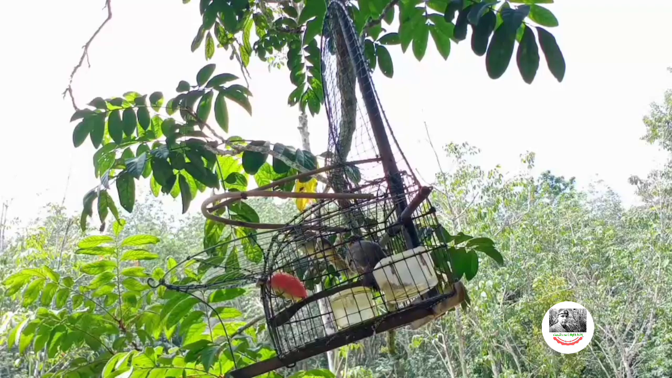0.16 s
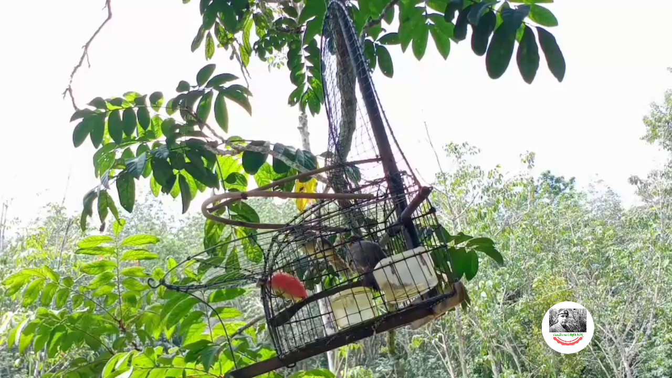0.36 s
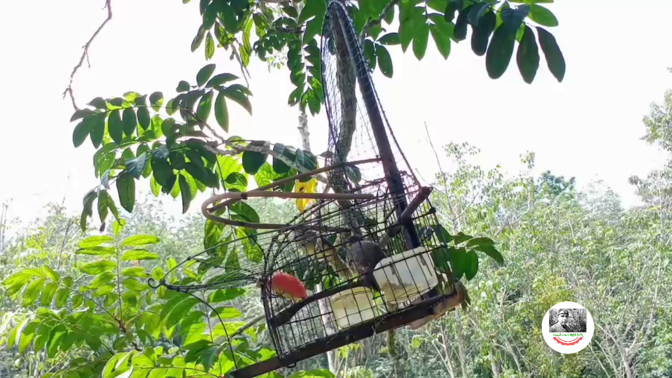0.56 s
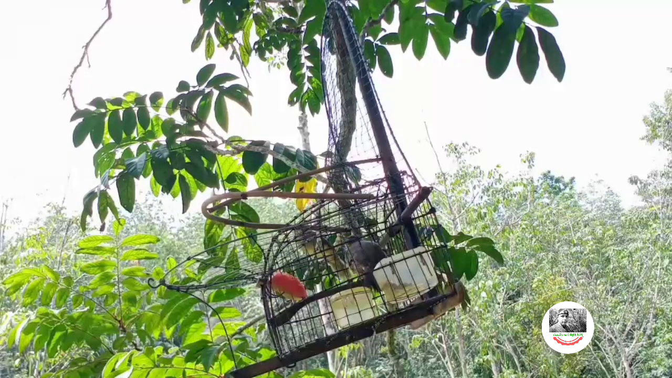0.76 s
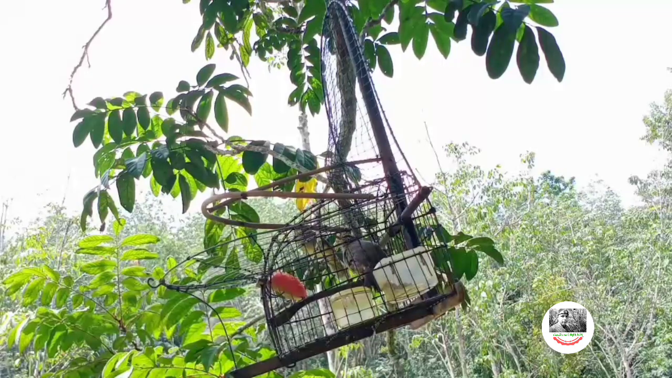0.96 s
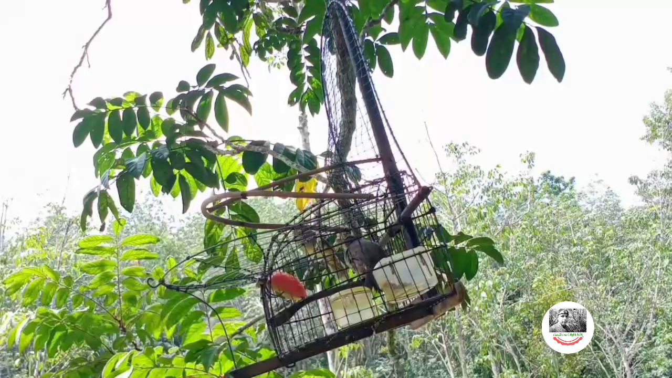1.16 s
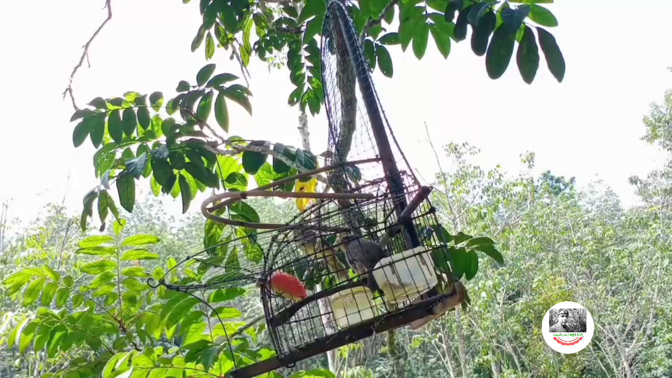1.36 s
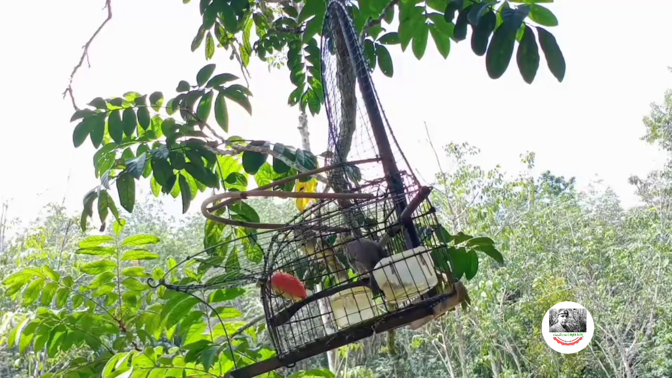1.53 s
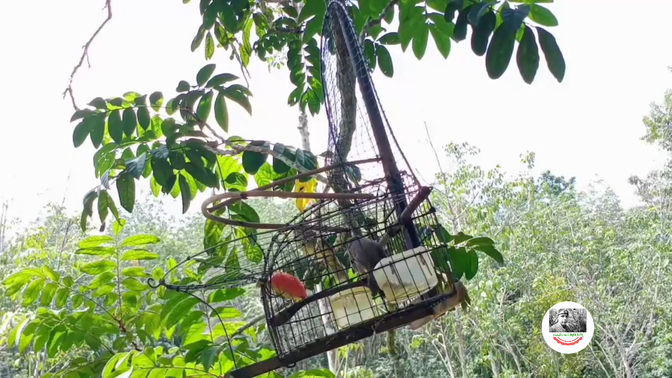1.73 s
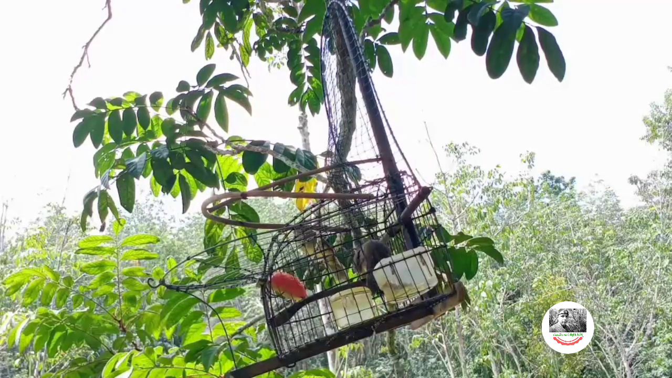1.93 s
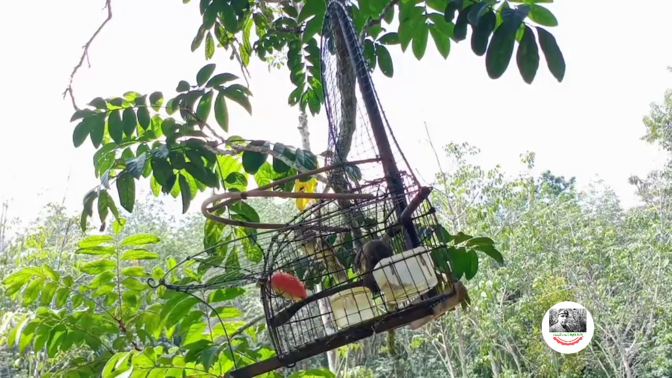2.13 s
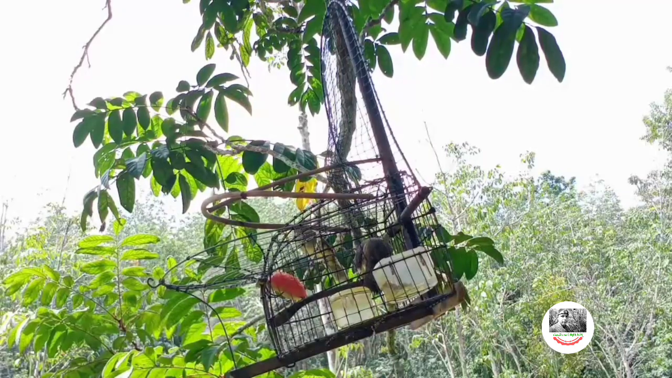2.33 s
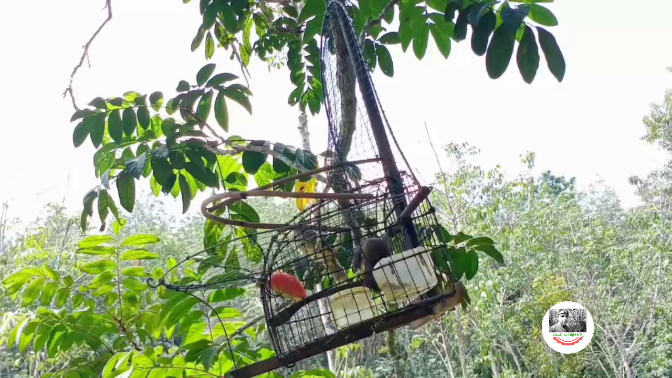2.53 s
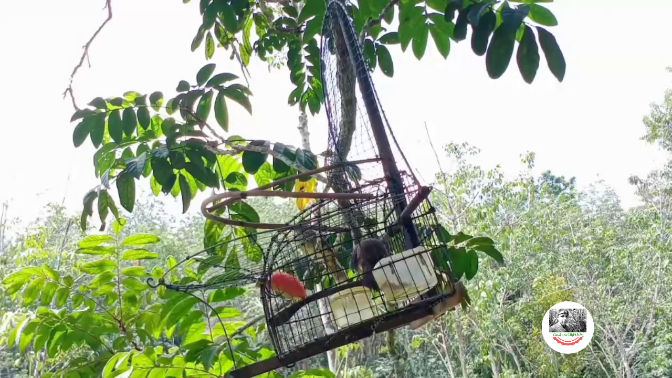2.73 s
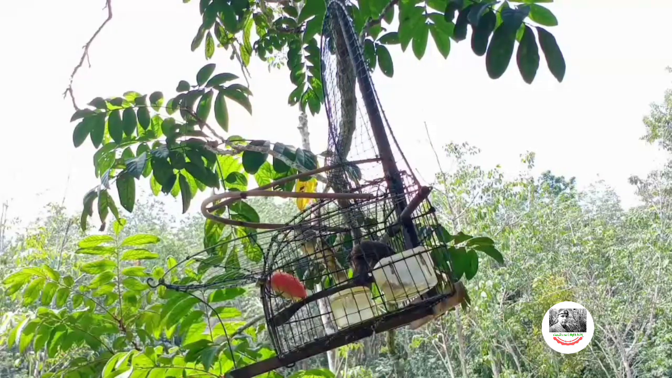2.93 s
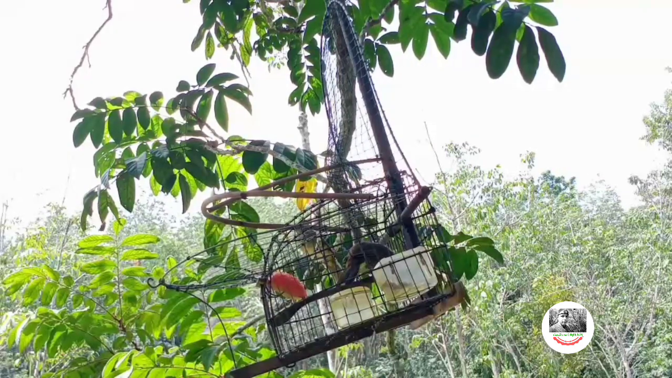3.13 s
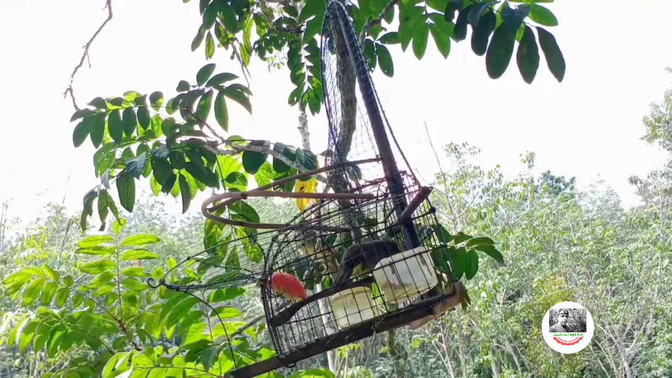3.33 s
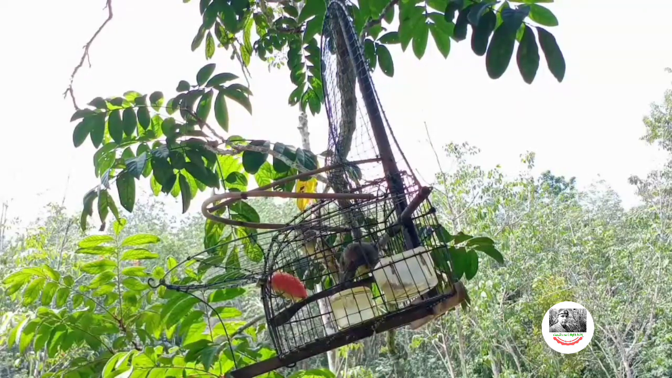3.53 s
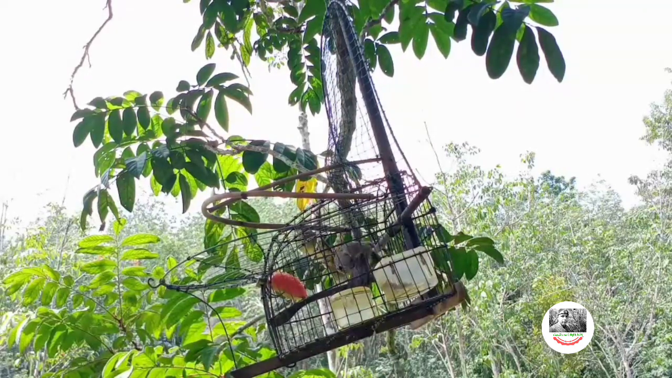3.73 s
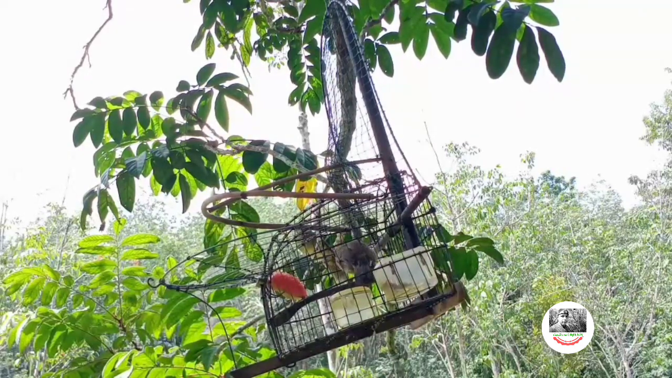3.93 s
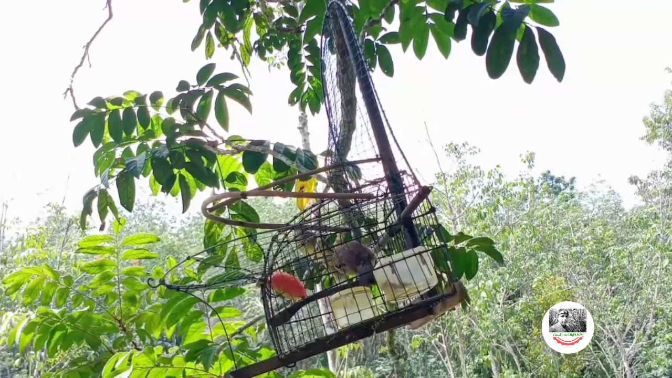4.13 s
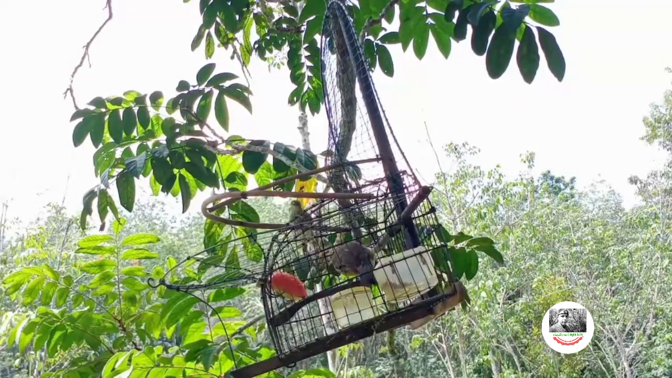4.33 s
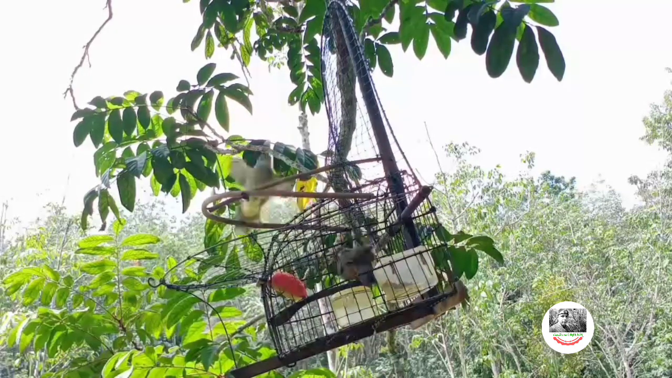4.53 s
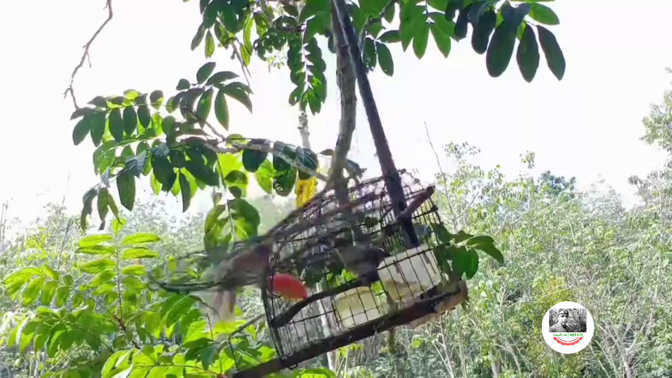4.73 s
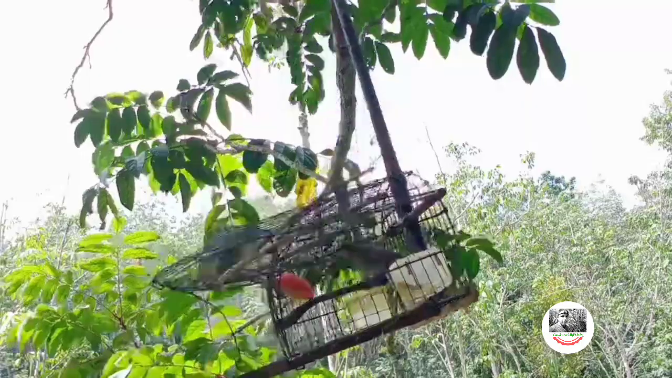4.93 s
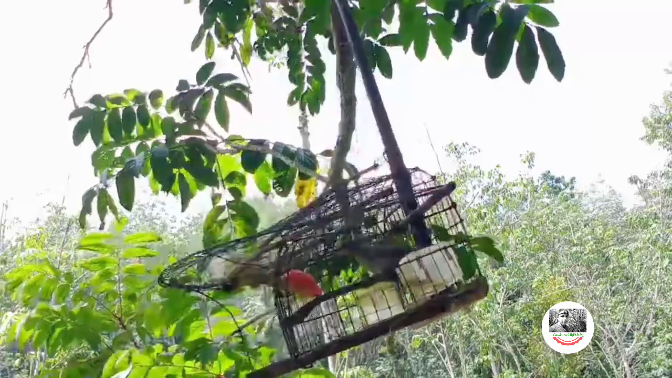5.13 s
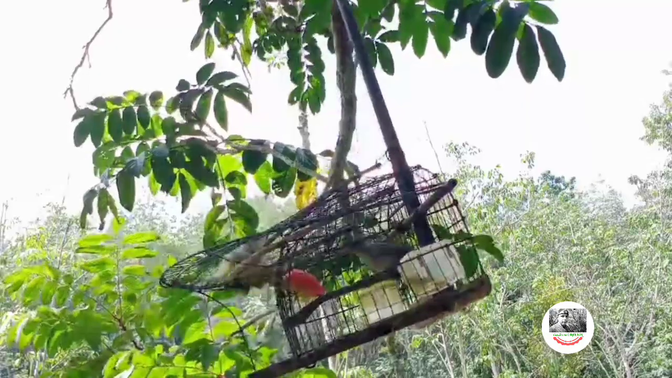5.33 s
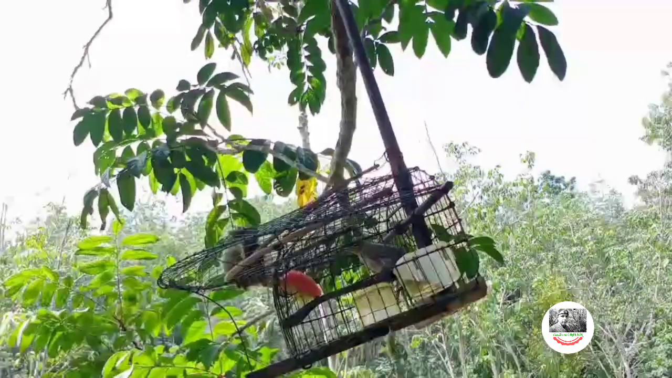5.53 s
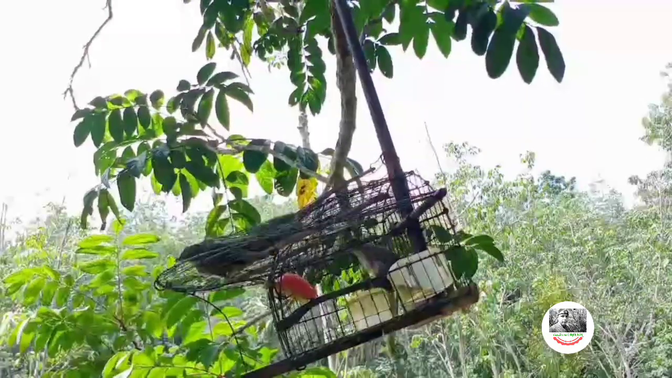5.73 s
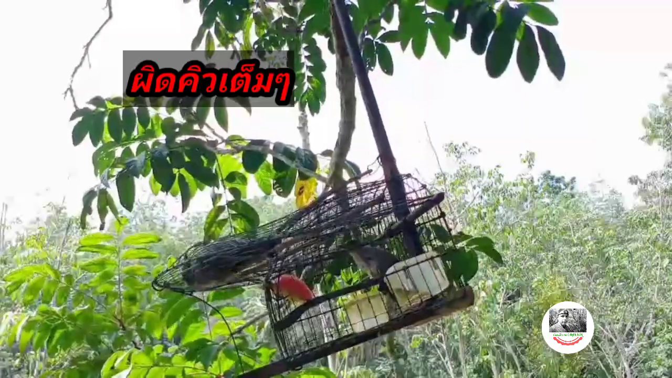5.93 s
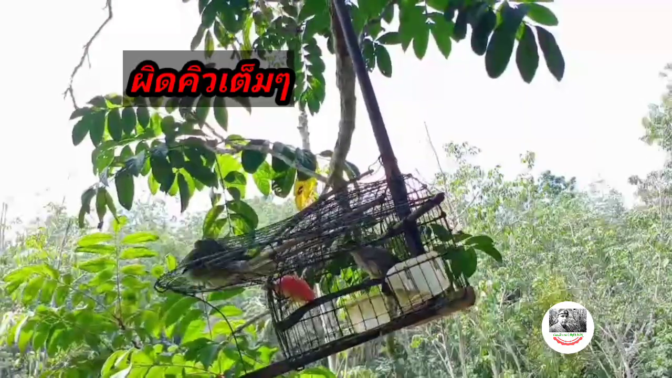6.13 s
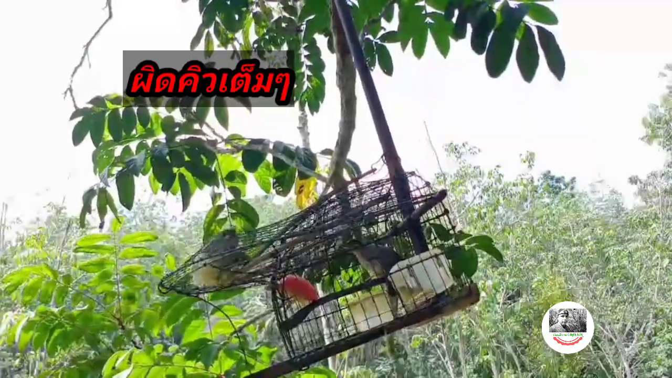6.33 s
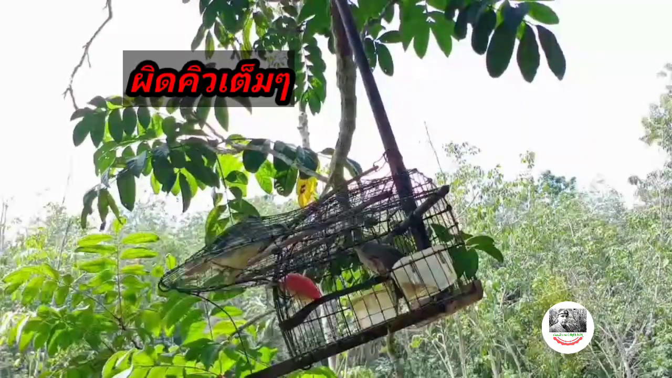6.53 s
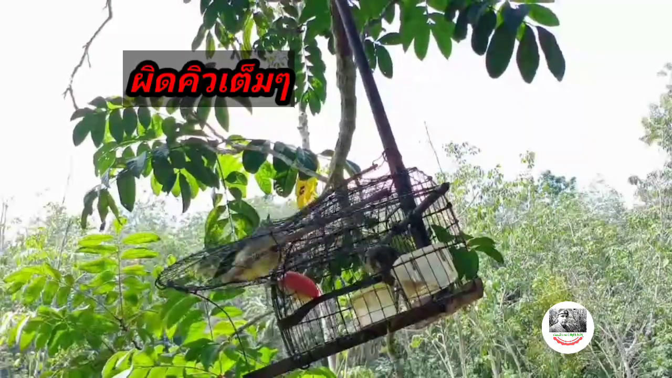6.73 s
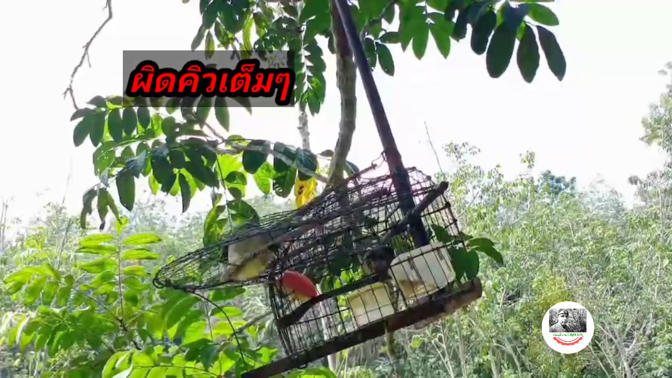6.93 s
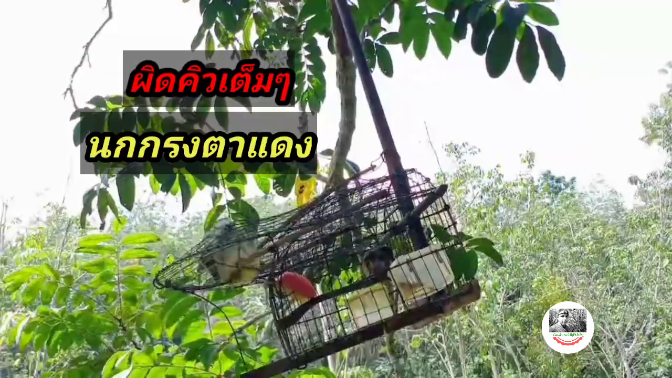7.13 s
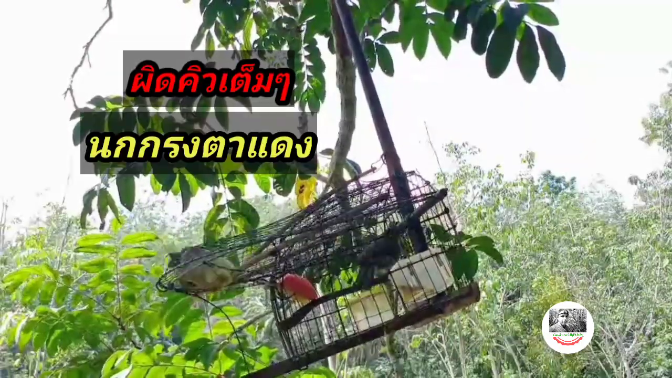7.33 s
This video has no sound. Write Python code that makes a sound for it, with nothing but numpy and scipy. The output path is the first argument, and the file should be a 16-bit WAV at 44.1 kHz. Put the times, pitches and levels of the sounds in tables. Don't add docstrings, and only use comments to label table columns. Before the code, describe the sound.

Calm open-air ambience: steady tiny chips, buzzy far trills blurred by leaves, an occasional clean rising whistle, soft low hum. Suddenly a sprung hoop slams on a wire cage, cracking and rattling loudly for under half a second with a dull puff of air. Afterwards feathers scrape wires, wings beat the net and claws tick bars, much softer, while sparse far calls continue. Close, dry cage; small phone microphone with crisp treble.

```python
import sys
import numpy as np
from scipy import signal
from scipy.io import wavfile
from scipy.ndimage import uniform_filter1d

SR = 44100
rng = np.random.default_rng(int(sys.argv[2]) if len(sys.argv) > 2 else 0)


def gain_from_db(level_db):
    decades = np.asarray(level_db, float) / 20
    return 10 ** decades


def master_out(mix):
    frames = np.transpose(np.atleast_2d(mix))
    ceiling = np.clip(frames, -1, 1)
    pcm = np.round(ceiling * 32767).astype(np.int16)
    wavfile.write(sys.argv[1], SR, pcm)


N = 325457


def cage():
    return gain_from_db(-1.2) * leaves(wings() + blows() + hoop(), .12, -20)


# peak in seconds, rise in ms, fall in ms, wires level in dB, frame level in dB.
SLAM_STROKES = [(4.482, 35, 21, -60.5, -71), (4.592, 64, 13, -58.5, -69), (4.665, 51, 37, -58, -58),
                (4.71, 23, 44, -60, -69), (4.754, 7.1, 33, -48, -40.5), (4.782, 3, 35, -36, -48),
                (4.808, 14, 3, -42, -71), (4.812, 2.2, 22, -37, -29), (4.831, 3, 29.3, -16.5, -15),
                (4.8224, 3, 7.3, -24, -23), (4.874, 14, 20, -26, -25), (4.893, 20, 9, -20.5, -32),
                (4.92, 22, 24, -35, -30.5), (4.938, 21, 3.6, -55, -29.5), (4.948, 92, 18, -40.5, -67),
                (4.996, 23, 15, -38.5, -43), (5.047, 33, 55, -39, -39), (5.079, 25, 18, -50, -38),
                (5.138, 50, 30, -42, -38), (5.186, 130, 18, -44, -56), (5.218, 12, 87, -54, -51.5)]
# peak in seconds, fall in ms, wires level in dB, frame level in dB.
WING_BEATS = [(5.353, 39, -50, -50), (5.435, 18, -49, -48), (5.48, 72, -49.5, -48), (5.569, 17, -48, -47),
              (5.62, 150, -50.5, -52), (5.79, 65, -47, -48.5), (5.843, 12, -42, -49),
              (5.937, 33, -48.5, -49), (6.02, 29, -55, -54), (6.098, 120, -57.5, -58.5),
              (6.16, 18, -51, -48), (6.291, 31, -51, -65), (6.364, 42, -48, -48.5), (6.44, 77, -56, -60),
              (6.518, 27, -48, -51), (6.568, 20, -45.5, -52), (6.612, 29, -45.5, -46),
              (6.67, 77, -50, -52.5), (6.778, 54, -42, -46), (6.912, 51, -43.5, -53),
              (6.995, 34, -49.5, -54.5), (7.06, 39, -46.5, -50), (7.149, 18.3, -35, -36.5),
              (7.269, 37, -51, -50.5), (7.345, 40, -55, -54)]
# peak in seconds, fall in ms, wires level in dB, frame level in dB.
WING_SLAPS = [
    (5.673, 7.8, -41.5, -41),
    (5.743, 19, -46.5, -43.5),
    (6.187, 72, -49, -49.5),
    (6.256, 14, -41, -38),
    (6.716, 47, -43.5, -39.5),
    (6.889, 20, -40.5, -38.5),
]
# peak in seconds, fall in ms, level in dB.
AIR_PUFFS = [(4.834, 15, -22), (4.89, 21, -33), (4.995, 15, -46), (5.065, 43, -44.5), (5.138, 20, -35),
             (5.36, 39, -49), (5.45, 55, -51), (5.585, 79, -51.5), (5.743, 27, -45), (5.85, 12, -45),
             (5.94, 27, -50), (6.19, 45, -55), (6.257, 9.4, -36), (6.367, 26, -45), (6.765, 67, -46.5),
             (6.888, 14, -35), (7.04, 55, -50), (7.145, 22, -42), (7.27, 35, -58)]
# pitch in Hz, width in Hz, level in dB.
FRAME_RINGS = [(1067, 330, -7.5), (1330, 190, -3.5), (1643, 470, -1.5), (2150, 660, -6.5), (2480, 650, -3),
               (3144, 490, -2.5), (3630, 1140, -1.5), (740, 300, -17)]
# frequency in Hz, level in dB per Hz.
PUSH_SPECTRUM = [(35, -24), (60, 2), (340, 6), (421, 1.5), (900, 2.5), (1170, -6.5), (1980, -120)]
# frequency in Hz, level in dB per Hz.
WIRE_SPECTRUM = [(2650, -19), (4500, -16), (5130, -18.5), (5910, -10), (6370, -13), (8410, 2), (9390, -5),
                 (11000, -13.5), (14800, -17), (15800, -8)]


def wings():
    rows = [(s, 0.81 * rise, *rest) for s, rise, *rest in SLAM_STROKES]
    rows += [(s, 0.82 * fall, fall, *levels) for s, fall, *levels in WING_BEATS]
    rows += [(s, 5.5, *rest) for s, *rest in WING_SLAPS]
    wire_envelope = strokes([(s, rise, fall, wires_db) for s, rise, fall, wires_db, _ in rows])
    frame_envelope = strokes([(s, rise, fall, frame_db) for s, rise, fall, _, frame_db in rows])
    push_envelope = strokes([(s, 0.77 * fall, fall, db) for s, fall, db in AIR_PUFFS])

    flutter = gain_from_db(1.7 * slow(0.0028))
    wires = wire_envelope * flutter * grains(8000, 1.3, .7)
    canes = np.zeros(N)
    for hz, width, db in FRAME_RINGS:
        brushing = gain_from_db(db + 1.5 * slow(.008))
        canes += brushing * resonate(grains(1400, 2, .6), hz, width)
    frame = frame_envelope * flutter * evened(canes)
    gusts = np.minimum(push_envelope, .8 * frame_envelope) * rng.standard_normal(N)
    return coloured(wires, WIRE_SPECTRUM) + gain_from_db(-2.13) * frame + gain_from_db(-2.0) * coloured(gusts, PUSH_SPECTRUM)


# start in seconds, wires level in dB, bar level in dB, ring of the bar in Hz.
LID_BLOWS = [(4.738, -46, -48, 1460), (4.7466, -37, -31, 3300), (4.7514, -25.5, -54, 900),
             (4.7662, -37, -38, 3830), (4.7767, -30, -49, 1290), (4.7861, -19, -40, 4400),
             (4.801, -29, -55, 3550), (4.82, -25, -30, 990), (4.8293, -5.5, -18, 3080),
             (4.8322, -7, -17, 1500), (4.8385, -16, -27, 1600), (4.8423, -10, -22, 3100),
             (4.8498, -16, -27, 1310), (4.8535, -17, -20, 1100), (4.8755, -18, -22, 4500),
             (4.8085, -29, -31, 3800), (4.797, -27, -43, 1500), (4.8802, -15, -23, 1120),
             (4.8912, -15, -19.5, 1430), (4.8965, -19, -21, 1260), (4.9095, -20, -38, 1510),
             (4.9905, -27.5, -32, 3300), (4.9945, -33, -39, 1100), (4.7598, -45, -41, 1300),
             (4.771, -46, -36, 1320), (4.9555, -45, -41, 1350), (4.964, -45, -40, 1350),
             (4.978, -41, -36, 1350)]
# start in seconds, wires level in dB, bar level in dB, ring of the bar in Hz.
CLAW_BLOWS = [(5.0575, -31, -38, 2470), (5.106, -26, -35, 4020), (5.114, -37, -38, 800),
              (5.1593, -32, -36, 2830), (5.128, -36, -43, 1500), (5.175, -58, -40, 1400),
              (5.186, -55, -44, 1400), (5.074, -50, -38, 1500), (5.1435, -36, -36, 1760),
              (5.2558, -38.5, -40, 3360), (5.3558, -41, -46, 3770), (5.4267, -45, -47, 4050),
              (5.567, -36, -40, 980), (5.6336, -48, -37, 3400), (5.6697, -44, -26.5, 3440),
              (5.698, -45, -42.5, 1560), (5.7448, -42, -38.5, 1520), (5.936, -49, -41.5, 1170),
              (6.157, -39, -45, 2730), (6.19, -40, -36, 3360), (6.2543, -27.5, -26, 3760),
              (6.2608, -36, -38, 824), (6.312, -55, -41.5, 1380), (6.3506, -41, -44, 1620),
              (6.361, -52, -46, 1700), (6.378, -52, -50, 1800), (5.4913, -50, -43, 1800),
              (6.4155, -58, -40, 2150), (6.5653, -46, -41, 3190), (6.7301, -43, -38, 3100),
              (6.7457, -44, -39, 1300), (6.752, -44, -38, 1500), (6.769, -42, -37, 1500),
              (6.7115, -47, -38, 1310), (7.133, -44, -37, 1500), (7.1395, -34, -42, 2000),
              (6.7807, -31, -32.5, 3000), (6.8883, -39, -35, 3050), (6.8933, -44, -40, 800),
              (7.1453, -26.5, -44, 2940), (7.2632, -41, -43, 3500), (7.3178, -34.5, -42.5, 1370)]
# start in seconds, wires level in dB.
QUILL_TICKS = [(4.5736, -55), (5.073, -31), (5.1765, -42), (5.602, -40), (5.7243, -45), (5.7618, -42),
               (6.154, -45), (6.374, -42), (7.2052, -47), (5.1844, -35), (5.273, -40), (5.5496, -40),
               (5.6172, -47), (5.787, -37.5), (5.828, -40), (5.846, -46), (5.981, -44.5), (6.4566, -44),
               (6.608, -40), (6.691, -45), (7.045, -36.5), (7.3696, -46)]
# frequency in Hz, level in dB per Hz.
KNOCK_SPECTRUM = [(410, -36), (700, 5), (1330, -9), (2060, 6), (3480, -2), (4100, 2.5), (4710, 0.5),
                  (5500, -18), (7150, -57), (12100, -120)]


def blows():
    quills = [(s, db, db - 13.5, 1600) for s, db in QUILL_TICKS]
    wires, bars = np.zeros((2, N))
    t = np.arange(round(.04 * SR)) / SR
    crack_decay = gain_from_db(-60 * t / 0.013)
    for s, wires_db, bar_db, hz in LID_BLOWS + CLAW_BLOWS + quills:
        sharp, dull = rng.standard_normal((2, len(t)))
        sharp[0] = 5 * np.sign(sharp[0])
        dull[0] = 5 * np.sign(dull[0])
        add(wires, s, gain_from_db(wires_db + 0.5) * crack_decay * sharp)
        ring_decay = gain_from_db(-60 * t * hz / 34.7)
        knock = 0.57 * crack_decay * coloured(dull, KNOCK_SPECTRUM)
        ring = 0.89 * ring_decay * resonate(dull, hz, .27 * hz)
        add(bars, s, gain_from_db(bar_db + 2.5) * (knock + ring))
    return coloured(wires, WIRE_SPECTRUM) + bars


# peak in seconds, rise in ms, fall in ms, level in dB.
HOOP_SHUDDERS = [
    (4.765, 6.3, 13, -43),
    (4.835, 7.3, 36, -17),
    (4.925, 30, 15, -31),
    (4.965, 15, 18, -48),
    (5.08, 33, 24, -46),
    (5.15, 27, 30, -45.5),
]
# pitch in Hz, width in Hz, level in dB.
HOOP_RINGS = [(1085, 83, 1), (1337, 240, -1), (1550, 130, -0.5), (3090, 73, -10.5), (349, 39, -15)]


def hoop():
    rings = np.zeros(N)
    for hz, width, db in HOOP_RINGS:
        rings += gain_from_db(db) * resonate(grains(900, 2.6, 0.28), hz, width)
    return strokes(HOOP_SHUDDERS) * evened(rings)


# start in seconds, glide in seconds, top pitch in Hz, level in dB, octave level in the glide in dB.
NEAR_WHISTLES = [
    (0.766, 0.049, 2287, -51.5, -76),
    (3.797, 0.051, 2150, -49, -56),
]
# time in seconds, pitch in Hz, level in dB, octave level in dB.
SCOLDING = [
    [(1.011, 1640, -55, -85), (1.024, 2410, -56, -85), (1.031, 1770, -48, -66), (1.041, 1490, -55, -56),
     (1.055, 1600, -54, -72)],
    [(1.07, 1080, -53, -56), (1.08, 1060, -56, -52), (1.09, 1225, -56, -52.5), (1.102, 1230, -64, -59)],
]


def near_bird():
    out = np.zeros(N)
    hold = 0.043
    for s, glide, top_hz, db, glide_octave_db in NEAR_WHISTLES:
        top = s + glide
        held_octave_db = db - 26
        rows = [(s, .57 * top_hz, db - 21, glide_octave_db - 6),
                (s + 0.62 * glide, .76 * top_hz, db - 3.0, glide_octave_db),
                (top, .985 * top_hz, db, held_octave_db),
                (top + 0.27 * hold, top_hz, db, held_octave_db),
                (top + hold, 0.98 * top_hz, db - 4, held_octave_db)]
        add(out, *warble(rows, .006, 1.6))
    for rows in SCOLDING:
        add(out, *warble(rows, .006, 1.6))
    return leaves(out, .25, -16)


# start in seconds, length in seconds, from Hz, to Hz, level in dB.
FAR_SLURS = [
    (1.765, .035, 3600, 3720, -61),
    (2.048, .032, 3630, 3690, -62),
    (5.29, .035, 3450, 3720, -62),
    (6.4, .045, 8260, 7400, -54),
]
# time in seconds, pitch in Hz, level in dB.
FIRST_LONG_RISE = [(1.797, 3150, -62), (1.81, 3380, -56), (1.85, 3760, -52), (1.87, 4050, -49),
                   (1.9, 4340, -50), (1.935, 4440, -49), (1.96, 4980, -55), (1.985, 5230, -58),
                   (2.01, 5430, -59)]
# time in seconds, pitch in Hz, level in dB.
SECOND_LONG_RISE = [(5.335, 3450, -60), (5.39, 3920, -57), (5.423, 4440, -55), (5.469, 4810, -52),
                    (5.495, 5300, -52), (5.513, 5740, -49), (5.53, 5790, -54), (5.55, 5800, -58)]


def far_birds():
    out = np.zeros(N)
    for s, length, from_hz, to_hz, db in FAR_SLURS:
        rows = []
        for share, swell_db in [(0, -3.5), (0.42, 0), (1, 5.5)]:
            hz = from_hz + share * (to_hz - from_hz)
            rows.append((s + share * length, hz, db + swell_db, db + swell_db - 17))
        add(out, *warble(rows, .014, 2.5))
    for rise in (FIRST_LONG_RISE, SECOND_LONG_RISE):
        rows = [(s, hz, db - 1.5, db - 18) for s, hz, db in rise]
        add(out, *warble(rows, .012, 2.2))
    add(out, 0.028, gain_from_db(-7) * out.copy())
    return gain_from_db(-.5) * leaves(out, .4, -6)


# time in seconds, peak level in dB.
SMALL_CHIPS = [(0.0313, -49.5), (0.2219, -50.5), (0.4284, -50), (0.619, -51.5), (0.8135, -49.5),
               (0.9991, -49.5), (1.1787, -51.5), (1.3598, -51), (1.5494, -51), (1.724, -49),
               (1.9101, -48.5), (2.1121, -50), (2.2867, -50), (2.4922, -54), (2.6728, -51), (2.8734, -50),
               (3.055, -51), (3.261, -50.5), (3.4426, -49.5), (3.6381, -48.5), (3.8237, -49),
               (4.0113, -48.5), (4.2153, -48), (4.4044, -48.5), (4.585, -49.5), (5.7099, -53),
               (5.9095, -53), (6.124, -49), (6.3899, -53), (6.5854, -51)]


def chips():
    out = np.zeros(N)
    t = np.arange(round(.012 * SR)) / SR
    swell = np.sin(np.pi * t / t[-1]) ** .8
    for s, db in SMALL_CHIPS:
        detune, drop = rng.random(2)
        hz = 4890 * (.98 + .02 * detune + (.03 + .07 * drop) * np.exp(-t / .003))
        phase = 2 * np.pi * np.cumsum(hz) / SR
        chip = swell * (np.sin(phase) + gain_from_db(-11) * np.sin(2 * phase))
        add(out, s - .004, gain_from_db(db - .5) * chip)
    return leaves(out, .35, -6)


# start in seconds, length in seconds, pitch in Hz, level in dB.
FAR_TRILLS = [(.02, 0.26, 6850, -70), (.46, 0.18, 7700, -67), (0.576, 0.27, 7400, -61),
              (0.982, .092, 7960, -62), (1.097, .1, 7700, -61), (1.259, .17, 8540, -63),
              (1.623, 0.35, 5660, -63), (1.809, .085, 7750, -66), (1.929, .08, 7930, -60),
              (2.033, 0.099, 7720, -60.5), (2.492, .1, 8100, -66), (2.626, .23, 8450, -59),
              (2.918, .11, 7810, -61), (3.014, .11, 7900, -60), (3.16, 0.081, 8030, -60),
              (3.255, .13, 7860, -60), (3.35, .25, 8530, -65.5), (4.15, .2, 8630, -63),
              (4.469, .081, 7490, -64), (4.567, .08, 7800, -60.5), (4.651, .08, 7800, -60.5),
              (7.196, .19, 5830, -63)]


def trills():
    out = np.zeros(N)
    width = 500
    for s, length, start_hz, db in FAR_TRILLS:
        t = np.arange(0, length, 1 / SR)
        noise = rng.standard_normal(len(t))
        hz = start_hz - 500 * t
        skirt = (.5 + 1.3 * np.exp(-t / .02)) * resonate(noise, hz - 400, 4 * width)
        buzz = resonate(noise, hz, width) + skirt
        throb = 1 + 0.34 * np.sin(2 * np.pi * 42 * t)
        fade = gain_from_db(db - 11 * t / length) * signal.windows.tukey(len(t), .15)
        add(out, s, fade * throb * buzz)
    return leaves(out, .45, -5)


# frequency in Hz, level in dB per Hz.
AIR_SPECTRUM = [(15, -45), (25, -17.5), (82, -1), (167, -4.5), (220, -6.5), (309, -7), (382, -8.5),
                (704, -11.5), (1170, -15), (3900, -20.5), (5070, -67), (8580, -120)]
# frequency in Hz, level in dB per Hz.
INSECT_SPECTRUM = [(2290, -8), (3900, -12), (4110, -4.5), (4900, -1), (5640, -9), (6160, -3), (8010, -3.5),
                   (9170, -5), (10400, -14), (13800, -17), (14900, -13), (15800, -27)]
# pitch in Hz, width in Hz, level in dB.
THIN_DRONES = [(224.6, 18.5, -64), (363.5, 38, -69.5), (6070, 25, -75), (6780, 64, -74.5), (4700, 600, -70)]


def air():
    wind = gain_from_db(-54 + .4 * slow(.2)) * evened(coloured(rng.standard_normal(N), AIR_SPECTRUM))
    insects = gain_from_db(-62 + 0.1 * slow(0.025)) * evened(coloured(rng.standard_normal(N), INSECT_SPECTRUM))
    out = wind + insects
    for hz, width, db in THIN_DRONES:
        out += gain_from_db(db + 1.5 * slow(.3)) * resonate(rng.standard_normal(N), hz, width)
    return out


def strokes(rows):
    power = np.zeros(N)
    late = 1000 * np.arange(-.25, .35, 1 / SR)
    for s, rise, fall, db in rows:
        drop_db = 20 * np.maximum(-late / max(rise, 2), late / max(fall, 2))
        add(power, s - .25, gain_from_db(2 * db - drop_db))
    return np.sqrt(power)


def grains(per_s, spread_db, hiss):
    sizes = gain_from_db(spread_db * np.minimum(rng.exponential(1, N), 4)) * rng.choice([-1., 1.], N)
    slips = sizes * (rng.random(N) < per_s / SR)
    return evened(slips) + hiss * rng.standard_normal(N)


def warble(rows, tremor, flicker_db):
    s, *columns = np.transpose(rows)
    t = np.arange(s[0], s[-1], 1 / SR)
    hz, db, octave_db = (uniform_filter1d(np.interp(t, s, c), size=260) for c in columns)
    wanders = uniform_filter1d(rng.standard_normal((2, len(t))), size=250, axis=1)
    shake, flicker = (evened(v) for v in wanders)
    phase = 2 * np.pi * np.cumsum(hz * (1 + tremor * shake)) / SR
    tone = gain_from_db(db) * np.sin(phase) + gain_from_db(octave_db) * np.sin(2 * phase)
    return s[0], np.sqrt(2) * gain_from_db(flicker_db * flicker) * tone * signal.windows.tukey(len(t), .1)


def leaves(x, t60, wet_db):
    t = np.arange(SR // 2) / SR
    sparse = rng.standard_normal(len(t)) * (rng.random(len(t)) < .1)
    taps = sparse * gain_from_db(-60 * t / t60) * (t > .008)
    return x + gain_from_db(wet_db) * signal.oaconvolve(x, taps / np.linalg.norm(taps))[:N]


def resonate(x, hz, width):
    turn = np.exp(2j * np.pi * np.cumsum(hz * np.ones(len(x))) / SR)
    r = np.exp(-np.pi * abs(width) / SR)
    smooth = signal.lfilter([1], [1, -2 * r, r * r], x / turn)
    return evened((turn * smooth).real)


def coloured(x, points):
    f, db = np.transpose(points)
    hz = np.fft.rfftfreq(4096, 1 / SR)
    log_gain = np.log(gain_from_db(np.interp(np.log(hz + 1), np.log(f + 1), db, left=-70, right=-70)))
    full = signal.hilbert(np.r_[log_gain, log_gain[-2:0:-1]])
    taps = np.fft.ifft(np.exp(np.conj(full))).real[:2048]
    return signal.oaconvolve(x, taps / np.linalg.norm(taps))[:len(x)]


def slow(seconds):
    size = max(round(seconds * SR), 2)
    return evened(uniform_filter1d(uniform_filter1d(rng.standard_normal(N), size), size))


def evened(x):
    return x / np.sqrt(np.mean(x ** 2) + 1e-20)


def add(mix, s, sound):
    part = mix[max(round(s * SR), 0):][:len(sound)]
    part += sound[:len(part)]


def scene():
    return (cage() + near_bird() + far_birds() + chips() + trills() + air())[None]


def low_pass(x):
    return signal.sosfilt(signal.butter(12, 15750, fs=SR, output="sos"), x)


def record(dry):
    rounded = .8 * np.tanh(dry / .8)
    edge = signal.firwin(767, 15600, window=("kaiser", 9), fs=SR)[None]
    mix = signal.oaconvolve(rounded, edge, "same")
    return low_pass(mix)


dry = scene()
out = record(dry)
master_out(out)
```